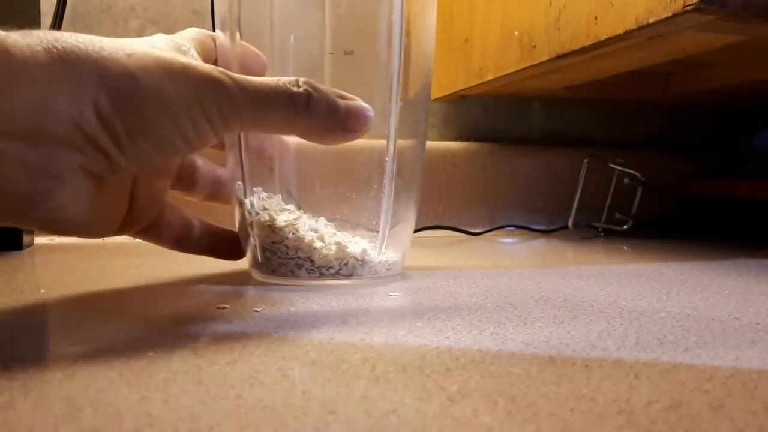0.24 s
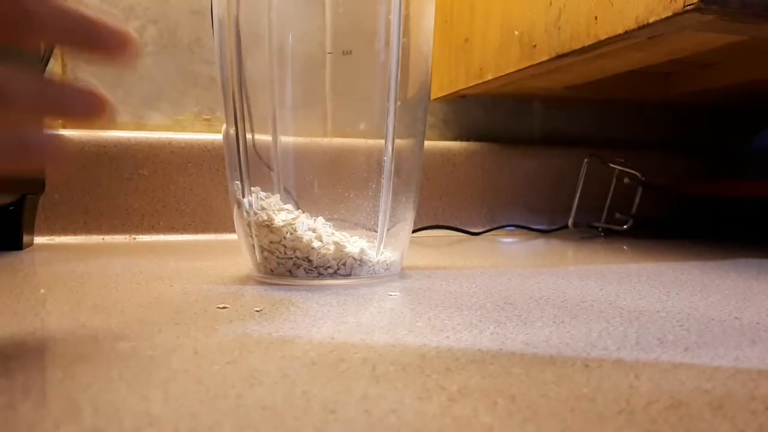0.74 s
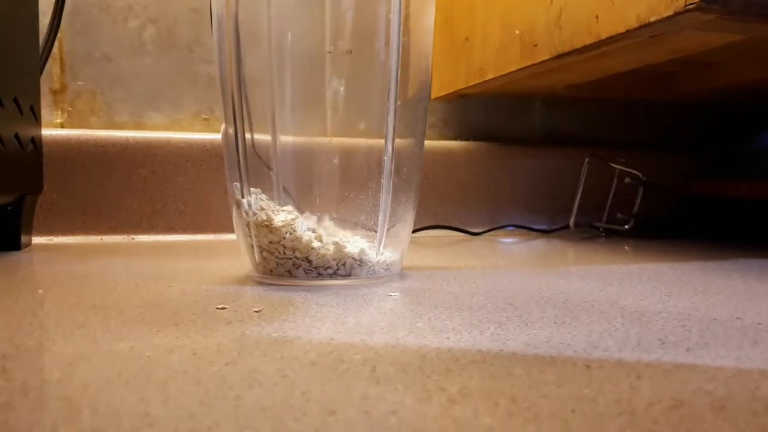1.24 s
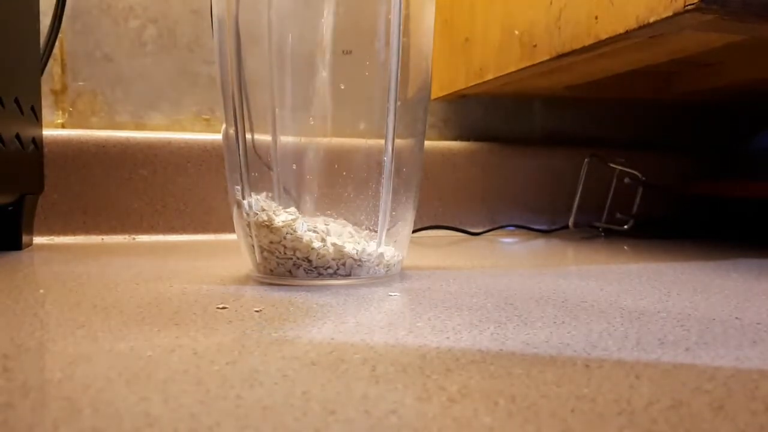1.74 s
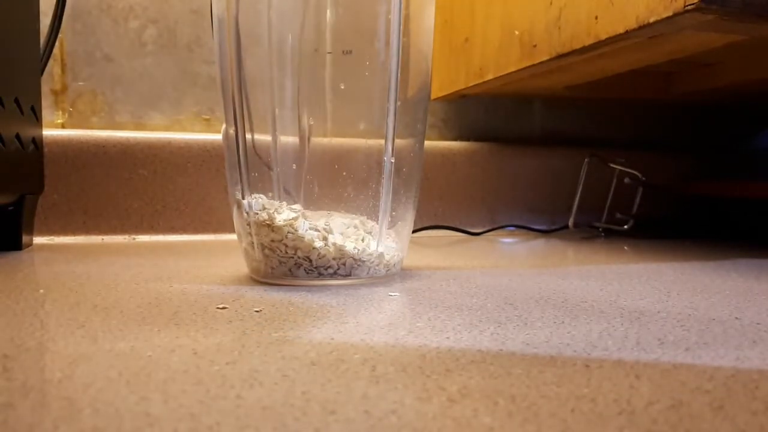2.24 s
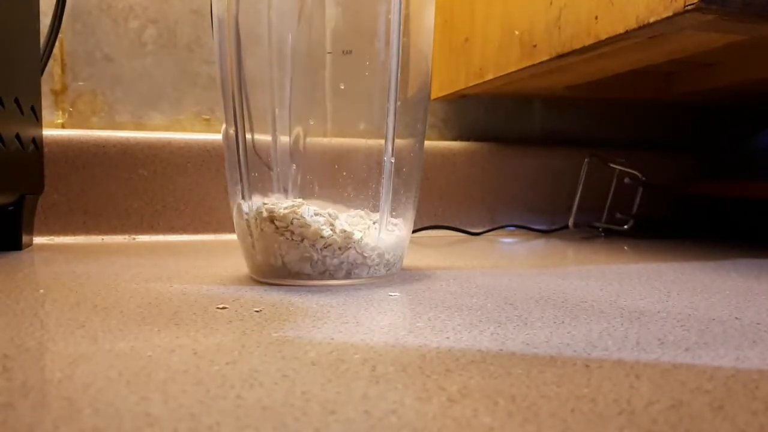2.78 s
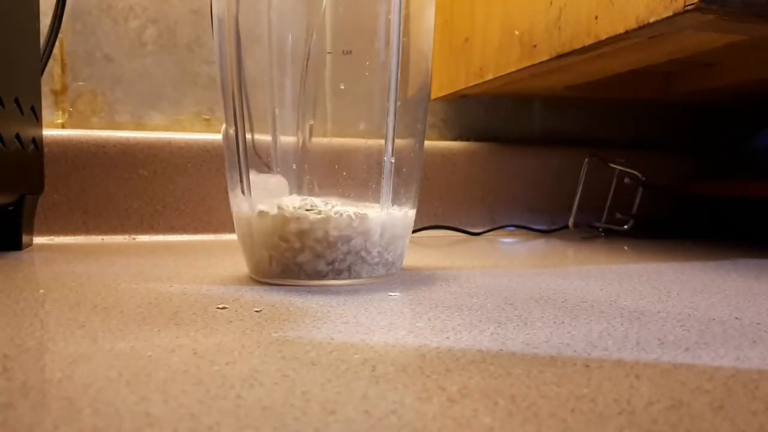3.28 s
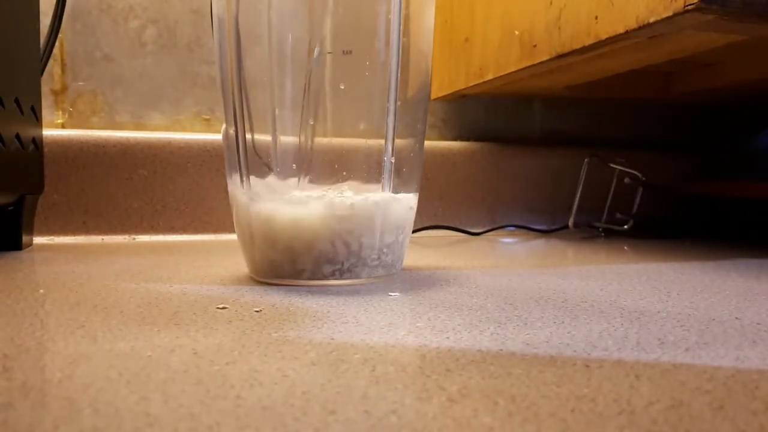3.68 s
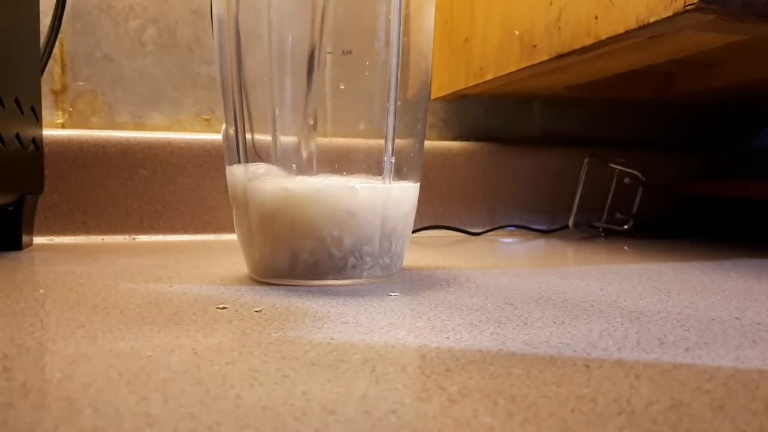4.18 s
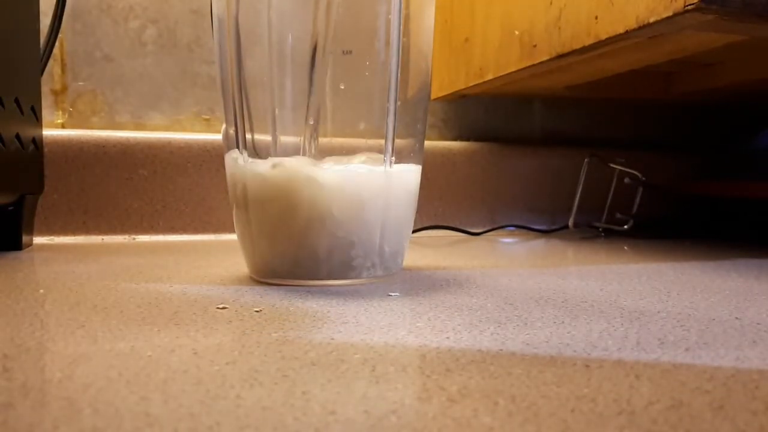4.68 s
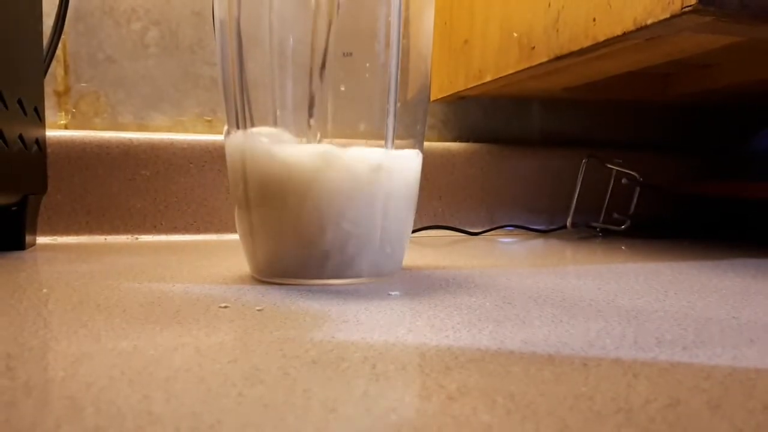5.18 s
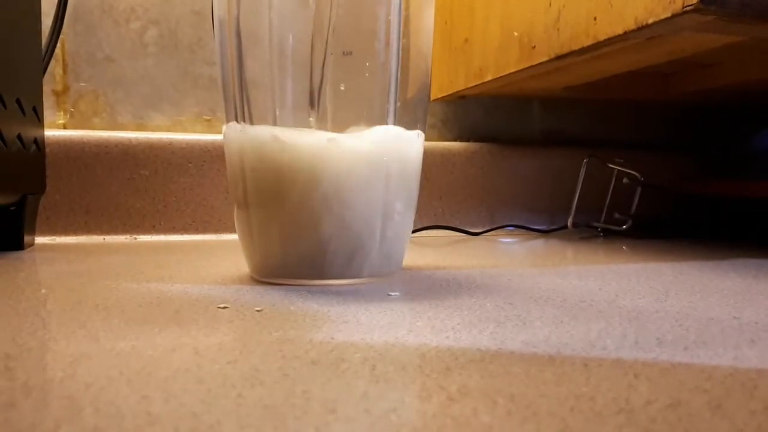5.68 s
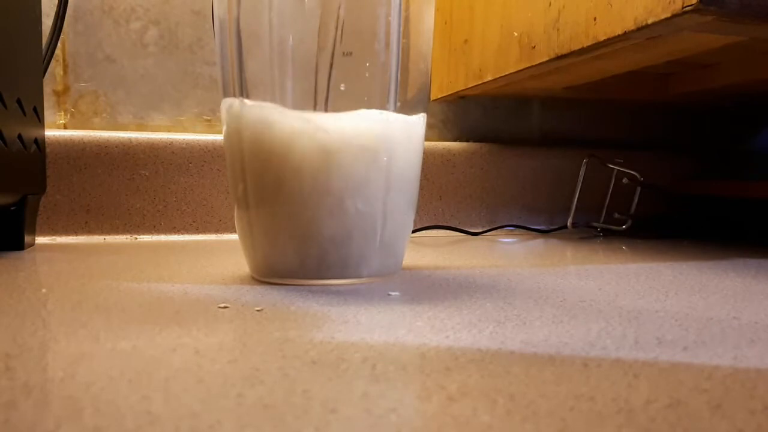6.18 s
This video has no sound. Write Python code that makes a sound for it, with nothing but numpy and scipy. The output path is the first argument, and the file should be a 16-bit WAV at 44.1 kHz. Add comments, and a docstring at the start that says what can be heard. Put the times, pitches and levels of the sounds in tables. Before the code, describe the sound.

A soft, brief rub of fingers leaving a plastic blender cup opens the sound, over a faint, steady kitchen appliance hum. At about 1.1 seconds water starts dribbling onto dry oats in the cup with a few hollow splats. From 1.6 seconds it gushes, pattering on the flakes and plastic walls, with bubbly plops and deep, hollow gulps that are loudest between 1.8 and 2.8 seconds. From 3 seconds the water pools and burbles, with small bright bubble pings and another gulp and blip near 3.6 seconds. After 4 seconds the stream runs ever more softly into the wet oats, the cup's hollow tone rising slightly as it fills. A thin ring and a light foamy fizz join around 4.6 seconds. The pour swells briefly near 5.8 seconds and dwindles to a faint trickle by about 6.4 seconds. Everything is close, with little room echo.

```python
"""Water poured onto dry oats in a tall plastic blender cup on a kitchen counter.
The stream patters on the flakes, gulps as it digs through them, then runs ever more softly into the slurry.
The air column above the water rings at a pitch that climbs as the cup fills.
Before the pour a hand lets go of the cup; the kitchen hums behind."""
import sys
import numpy as np
from scipy import signal
from scipy.fft import rfft, irfft, next_fast_len
from scipy.io import wavfile

SR = 44100
rng = np.random.default_rng(int(sys.argv[2]) if len(sys.argv) > 2 else 0)


def persist_wave(psi):
    """Save psi, clipped to +-1, as 16-bit WAV."""
    counts = np.round(np.clip(psi, -1, 1) * 32767).astype(np.int16)
    wavfile.write(sys.argv[1], SR, np.atleast_2d(counts).T)


N = 283563
TIME = np.arange(N) / SR

# Table levels are relative; each layer adds its own gain.
# stream strength in the first dribble, full pour and taper: time_s, level_db
FLOW_DRIBBLE = [(1.07, -70), (1.098, -56.5), (1.24, -52.5), (1.348, -65.5), (1.5, -69.5)]
FLOW_GUSH = [(1.52, -65), (1.665, -53), (1.69, -47), (1.92, -51.5), (1.94, -40.5), (2.05, -50.5),
             (2.57, -54), (2.62, -53.5), (3.71, -56), (3.75, -62.5)]
FLOW_TAPER = [(3.8, -59), (4.43, -57.5), (4.47, -51), (4.49, -61), (4.88, -60), (4.92, -64.5), (5.21, -63),
              (6.43, -74)]
# stream breaks into fresh oats and froths: start_s, length_s, boost_db
SURGES = [(1.223, 0.094, 8.5), (2.195, 0.1, 7), (2.576, 0.24, 8.5), (2.997, 0.08, 7), (3.188, 0.086, 6.5),
          (3.652, 0.21, 4), (4.385, 0.076, 2.5), (4.712, 0.18, 3), (5.08, .09, 2.5), (5.22, .34, 2),
          (5.826, 0.2, 8)]
# oats under water: time_s, share
SOAKED_SHARE = [(1.35, 0.1), (1.7, 0.67), (2.9, 0.72), (4.0, 0.99)]
# churning that stirs the air in the cup: time_s, level_db
CHURN_LEVEL = [(1.07, -88), (1.67, -52.5), (1.89, -48), (2.01, -42.5), (2.62, -43.5), (3.13, -48.5),
               (4.2, -55), (5.1, -64), (5.61, -58), (6.43, -61)]
# thin ring of the filling cup: time_s, level_db
THIN_RING_LEVEL = [(4.1, -82), (4.6, -67), (5.5, -70.5), (6.43, -79)]

# splashes on flakes and wall: start_s, splash_db, spray_db
SPLASHES = [(1.1, -48.5, -64), (1.1774, -43.5, -55), (1.2137, -38, -49.5), (1.2587, -40, -53),
            (1.535, -48.5, -66), (1.557, -58, -60), (1.593, -42.5, -50.5), (1.643, -52, -51.5),
            (1.657, -64, -54), (1.6772, -30.5, -57), (1.709, -31, -54), (1.721, -41, -50),
            (1.837, -34, -50.5), (1.939, -25.5, -51), (1.9935, -28, -60), (2.122, -36.5, -61),
            (2.244, -33.5, -50.5), (2.369, -37.5, -59), (2.485, -37.5, -68), (2.601, -34.5, -56),
            (2.626, -50, -54), (2.649, -33.5, -52.5), (2.68, -43, -61), (2.736, -39, -58),
            (2.7543, -38, -59), (2.764, -39, -58), (2.807, -49, -62), (2.8737, -36.5, -80),
            (2.93, -36, -70), (3.1875, -56, -59), (3.211, -42, -65), (3.4292, -49, -63),
            (3.533, -39.5, -63), (3.59, -43, -63), (3.69, -60, -61), (4.2924, -46, -66), (4.458, -48, -61)]
# fat blobs hitting the dry heap: start_s, level_db
BLOBS = [(1.2373, -33), (1.2585, -34), (1.276, -37), (1.298, -43), (1.644, -40), (1.688, -40), (1.769, -40),
         (1.859, -37)]
# air pockets driven under: start_s, throb_db, thump_db, pitch_hz
GULPS = [(1.747, -35, -47, 558), (1.77, -34.5, -50, 554), (1.795, -28, -38, 531), (1.821, -23.5, -37, 526),
         (1.86, -23.5, -33, 531), (1.88, -22.5, -41, 542), (1.908, -33, -36, 566), (1.918, -19.5, -35, 548),
         (1.948, -24, -38, 555), (1.972, -33, -41, 570), (2.006, -31.5, -45, 595), (2.041, -26.5, -42, 546),
         (2.103, -31.5, -60, 525), (2.123, -31, -43, 562), (2.136, -27.5, -44, 558),
         (2.184, -36.5, -61, 555), (2.222, -22, -34, 532), (2.238, -17, -42, 525),
         (2.264, -20.5, -28.5, 532), (2.294, -22.5, -47, 538), (2.329, -34, -53, 543),
         (2.347, -27, -35.5, 538), (2.368, -29, -38, 554), (2.415, -33.5, -40.5, 534),
         (2.446, -32.5, -48, 549), (2.473, -35, -54, 537), (2.536, -33, -48, 559), (2.594, -27, -37, 546),
         (2.606, -16, -27, 544), (2.619, -18, -25, 534), (2.638, -17, -43, 535), (2.658, -21.5, -28.5, 557),
         (2.675, -20, -20.5, 555), (2.695, -16.5, -42, 534), (2.723, -28, -25, 558),
         (2.74, -26.5, -24.5, 558), (2.755, -23.5, -48, 540), (2.771, -30.5, -31.5, 559),
         (2.806, -28.5, -31.5, 555), (2.873, -30, -42, 573), (2.932, -34.5, -46, 592),
         (2.988, -30.5, -46, 581), (3.046, -38, -57, 556), (3.087, -36, -56, 570), (3.208, -35.5, -62, 606),
         (3.232, -40, -44, 620), (3.354, -43.5, -39, 562), (3.4, -33, -52, 587), (3.527, -38.5, -39, 564),
         (3.612, -28.5, -27, 561), (3.686, -39, -37, 598), (3.713, -37.5, -37.5, 587),
         (3.933, -38.5, -50, 590), (3.948, -39, -40, 585), (4.049, -41, -40, 595), (4.353, -45.5, -58, 614),
         (4.381, -43.5, -55, 595), (4.468, -42, -36, 592)]
# large bubbles bursting at the surface: start_s, level_db
PLOPS = [(1.711, -36.5), (1.747, -34.5), (1.769, -34.5), (1.794, -34), (1.821, -37), (1.858, -31.5),
         (1.916, -31), (1.973, -36), (2.131, -41), (2.245, -35.5), (2.264, -40), (2.594, -36), (2.605, -30),
         (2.655, -49), (2.677, -50), (2.731, -37), (3.612, -37.5)]
# clear bubbles, each leading a cluster: start_s, level_db, pitch_hz
PINGS = [(2.986, -43, 2935), (3.0515, -47, 3500), (3.232, -46, 2725), (3.661, -50, 3500),
         (4.797, -56, 3000), (4.8544, -58, 2300), (5.0823, -57, 3530), (5.107, -58, 3090),
         (5.303, -59, 2280), (5.3494, -63, 2290), (5.544, -61, 3020), (5.9144, -63, 4200),
         (6.0145, -60, 3400), (6.178, -64, 3160)]
# one large bubble snapping shut: start_s, level_db, pitch_hz
BLIP = (3.6205, -38.5, 1244)
# skin slipping on plastic: start_s, level_db, fade_db_per_s
HAND_SLIPS = [(0, -49, 110), (0.168, -58.5, 41.3)]

# resonances: pitch_hz, width_hz, gain_db
CUP_MODES = [(159, 3.8, -3.5), (203.4, 7.5, -6), (261, 17.6, -1), (325.8, 22, 0.5), (359.6, 19, 2),
             (542, 38, -6.5)]  # cup standing on the counter
DRY_DRUM_MODES = [(155.5, 6.2, 6), (178.5, 12, 3.5), (239.7, 20, 5)]  # cup drummed through dry flakes
DRY_KNOCK_MODES = [(1480, 66, 3), (1905, 180, -5.5)]  # cup knocked through dry flakes
WET_KNOCK_MODES = [(1030, 520, -17.5), (1490, 120, -7.5)]  # knock dulled by water
WALL_MODES = [(5120, 76, 9), (5910, 90, -1), (6170, 79, 2), (6630, 120, 1), (7500, 180, -4.5)]  # thin wall under spray
UPPER_CUP_MODES = [(1818, 40, -6), (2590, 80, -1), (2980, 70, -2), (3170, 70, -4), (3520, 190, -5),
                   (4870, 30, -5)]  # cup above the water
HOLLOW_MODES = [(1490, 130, 0.5), (1950, 250, -4), (2500, 250, -15)]  # empty cup slapped by blobs
PLOP_MODES = [(690, 60, -2), (885, 70, 0.5), (1020, 190, 5), (1450, 88, 4.5)]  # surface closing over a pocket

# noise spectra: freq_hz, density_db
PATTER_SPECTRUM = [(1000, -12.5), (1700, -14.5), (2180, -8.5), (2680, -0.5), (3200, -6), (3560, -1),
                   (4540, -12), (5010, -9), (5430, -15), (6000, -15), (7800, -46), (13200, -120)]
SPRAY_SPECTRUM = [(3000, -27), (4500, -8), (5500, -9), (7000, -3.5), (8300, -5.5), (9400, -18.5),
                  (11000, -9.5), (16000, -16)]
SLAP_SPECTRUM = [(400, -44), (700, 1), (1100, 3), (1550, -16), (2400, -6), (3200, 3), (6000, -43)]  # splash on bare flakes
FINGER_SPECTRUM = [(200, -8), (700, -12.5), (1100, -12), (1900, -26.5), (2400, -19.5), (4000, -26.5),
                   (5200, -45), (16000, -47)]
REFLECTION_SPECTRUM = [(300, -17), (600, -13), (1400, 2.5), (4000, -3.5), (16000, -3.5)]
KITCHEN_SPECTRUM = [(15, -63), (25, -44), (49, -5.5), (157, -10), (217, -3), (293, -6.5), (354, 1),
                    (384, -12), (531, -9.5), (714, -16), (775, -19), (936, -25.5), (1130, -22.5),
                    (1890, -35.5), (16000, -47)]

# bubble and droplet strength: pitch_hz, weight_db
BURBLE_WEIGHTS = [(680, -16), (800, -8), (1050, 6), (1250, 1.5), (1480, 3.5), (1700, -5), (2100, -3),
                  (3000, -32)]  # trapped bubbles
PLINK_WEIGHTS = [(2000, -13), (2300, 3), (2800, 7), (3600, 8), (4200, 4.5), (4900, -10)]  # small bubbles
SPIT_WEIGHTS = [(4200, 1), (6500, -1), (8200, -5), (9500, -13), (11000, -9), (15000, -14)]  # tiniest droplets
FOAM_WEIGHTS = [(3500, 1), (4100, -5), (5000, -8.5), (6200, -16)]

# left-right likeness of diffuse sound: freq_hz, correlation
STEREO_CORRELATION = [(60, 0.94), (300, 0.64), (640, 0.03), (1400, 0.054), (3000, 0.06), (15000, 0.065)]

FIRST_DROP_DB = 16  # over the droplets that follow


def stream():
    """Gains over time: the flow drives five layers, the churning drives the air column."""
    flow_db = curve(np.vstack([FLOW_DRIBBLE, FLOW_GUSH, FLOW_TAPER]))
    surge_db = surge_boost_db()
    pouring = np.clip((TIME - FLOW_DRIBBLE[0][0]) / 0.1, 0, 1)
    patter = flow_gain(flow_db, base_db=-56, slope=1) * from_db(0.34 * surge_db) * wobble()
    flake_spray = flow_gain(flow_db, base_db=-56.5, slope=0.57) * bare_share(TIME)
    pool_spray = flow_gain(flow_db, base_db=-70, slope=0.41)
    spray = np.hypot(flake_spray, pool_spray) * from_db(0.23 * surge_db)
    thickening_db = 3.5 * np.maximum(TIME - 4.46, 0)  # thick slurry traps fewer bubbles
    froth = flow_gain(flow_db, base_db=-58, slope=1.14) * from_db(surge_db - thickening_db)
    drum = flow_gain(flow_db, base_db=-51.5, slope=0.88) * from_db(0.98 * surge_db)
    rings = flow_gain(flow_db, base_db=-63.5, slope=0.85)
    column = from_db(curve(CHURN_LEVEL) + 0.21 * surge_db)
    return pouring * np.array([patter, spray, froth, drum, rings, column])


def flow_gain(flow_db, base_db, slope, usual_flow_db=-56):
    """Layer gain: base_db at the usual flow, plus slope dB per dB of flow."""
    return from_db(base_db + slope * (flow_db - usual_flow_db))


def surge_boost_db(edge_s=0.0078):
    """Each surge swells, holds and falls back."""
    return sum(db * np.clip(np.minimum(TIME - start_s, start_s + length_s + edge_s - TIME) / edge_s, 0, 1)
               for start_s, length_s, db in SURGES)


def wobble(rate_hz=30, depth_db=1.8):
    """The stream wobbles at random, so drops and bubbles come in clumps."""
    steps = rng.standard_normal(int(TIME[-1] * rate_hz) + 2)
    return from_db(depth_db * np.interp(TIME * rate_hz, np.arange(len(steps)), steps))


def bare_share(time_s, cover_start_s=1.53, cover_tau_s=0.74):
    """Share of flakes the pour has not yet covered."""
    return np.exp(-np.maximum(time_s - cover_start_s, 0) / cover_tau_s)


def soak():
    """Dry and flooded gains; powers sum to 1."""
    share = np.clip(curve(SOAKED_SHARE), 0, 1)
    return np.sqrt(1 - share), np.sqrt(share)


def splashing(patter_gain, spray_gain, bubble_gain, dry, wet):
    """Drops and spray bounce between the plastic walls, ring them and knock the cup."""
    drops = impacts(per_s=700, spread_db=4)
    patter = patter_gain * (from_db(-4.5) * drops + from_db(-7) * impacts(per_s=5000, spread_db=-4))
    spray = spray_gain * (from_db(-4) * drops + from_db(-2) * impacts(per_s=510, spread_db=4.5))
    splats = np.zeros(N)
    for start_s, splash_db, spray_db in SPLASHES:
        clump = burst(rise_s=0.0004, t60_s=0.045)
        clump[0] += from_db(FIRST_DROP_DB)
        add(splats, start_s, from_db(splash_db - 7) * clump)
        add(spray, start_s, from_db(spray_db + 5.5) * clump)
    blows = from_db(12) * splats + from_db(1) * patter + from_db(14.5) * bubble_gain * drops
    knock = dry ** 4 * body(blows, DRY_KNOCK_MODES) + wet * body(blows, WET_KNOCK_MODES)
    stirred_air = from_db(23) * dry ** 2 * ring(ring(splats, 556, 114), 580, 460)
    flake_hits = wet * bare_share(TIME) * (splats + from_db(-10) * patter)
    slap = from_db(-5) * scatter(flake_hits, SLAP_SPECTRUM, t60_s=0.025, spots=2)
    wall = from_db(8) * scatter(body(spray, WALL_MODES), REFLECTION_SPECTRUM, t60_s=0.012, spots=2)
    spit = bubbles(SPIT_WEIGHTS, per_s=490, spread_db=3, cycles=200, left_db=3.5)
    pattering = scatter(patter + splats, PATTER_SPECTRUM, t60_s=0.036, spots=5)
    spraying = scatter(spray, SPRAY_SPECTRUM, t60_s=0.042, spots=4)
    return (pan(pattering, left_db=2) + pan(spraying + wall, left_db=2.5)
            + pan(knock + stirred_air + slap, left_db=0.5) + from_db(-6) * spray_gain * spit)


def gulping(column_gain, wet, throb_t60_s=0.07, bare_damping=0.8, upper_ratio=1.2):
    """Air pockets throb, water gurgles round them, churning keeps the air column ringing."""
    pockets, gurgles = np.zeros((2, N))
    upper_detunes = 1 + 0.039 * rng.standard_normal(len(GULPS))
    for (start_s, throb_db, _, pitch_hz), detune in zip(GULPS, upper_detunes):
        bare = bare_share(start_s)
        # bare flakes cut the throb short; among them a smaller pocket rings above it
        throb = chirp(pitch_hz, rise_s=0.0065, t60_s=throb_t60_s / (1 + bare_damping * bare),
                      climb_per_s=0.18)
        upper = chirp(upper_ratio * pitch_hz * detune, rise_s=0.012, t60_s=0.077, climb_per_s=0.33)
        add(pockets, start_s, from_db(throb_db) * (throb + from_db(-6) * bare * upper))
        add(gurgles, start_s, from_db(throb_db - 2) * burst(rise_s=0.0028, t60_s=0.075))
    stirring = impacts(per_s=1300, spread_db=2)
    churn = unit_rms(air_column(stirring, width_hz=36))
    churn += from_db(-17) * unit_rms(ring(ring(stirring, 660, 160), 850, 320))
    throbs = from_db(-3) * pockets + from_db(-20) * air_column(pockets, width_hz=11)
    gurgle = ring(ring(gurgles, 530, 180), 510, 670)
    return pan(throbs + column_gain * wet * churn + gurgle, left_db=2.4)


def air_column(x, width_hz, air_length_m=0.1591, fill_start_s=1.93, fill_m_per_s=0.009):
    """Air above the water: a quarter-wave pipe that shortens as the cup fills."""
    sound_m_per_s = 343
    length_m = air_length_m - fill_m_per_s * np.maximum(TIME - fill_start_s, 0)
    pitch_hz = sound_m_per_s / 4 / length_m
    phasor = np.exp(2j * np.pi * np.cumsum(pitch_hz) / SR)
    pole = np.exp(-np.pi * width_hz / SR)
    rung = 2 * (phasor * signal.lfilter([1 - pole], [1, -pole], x / phasor)).real
    return ring(rung, pitch_hz=573, width_hz=131)  # the mouth radiates a limited band


def drumming(drum_gain, wet):
    """Air pockets thump the cup and drops drum its low modes."""
    thumps = np.zeros(N)
    for start_s, _, thump_db, _ in GULPS:
        add(thumps, start_s, from_db([thump_db]))
    drops = impacts(per_s=1000, spread_db=2)
    wet_drum = from_db(-3) * drum_gain * wet * unit_rms(cup(drops, CUP_MODES))
    dry_gain = from_db(-51.5) * (drum_gain > 0) * np.sqrt(bare_share(TIME))
    dry_drum = dry_gain * unit_rms(cup(drops, DRY_DRUM_MODES))
    return pan(from_db(44) * cup(thumps, CUP_MODES) + wet_drum + dry_drum, left_db=2.4)


def cup(x, modes):
    """Low modes of the cup on the counter."""
    return bandpass(body(x, modes), band_hz=[110, 560])


def plopping():
    """Large bubbles burst; the surface closes over them."""
    pops = np.zeros(N)
    for start_s, level_db in PLOPS:
        add(pops, start_s, from_db(level_db + 5.5) * burst(rise_s=0.00021, t60_s=0.058))
    return pan(bandpass(body(pops, PLOP_MODES), band_hz=[550, 1800]), left_db=0.5)


def pinging(cluster_s=0.018, stray_octaves=0.23, follower_db=-5.5):
    """Single bubbles ring, each trailed by four weaker ones; one large bubble snaps shut."""
    pings = np.zeros(N)
    for start_s, level_db, pitch_hz in PINGS:
        leader = chirp(pitch_hz, rise_s=0.00063, t60_s=0.061, climb_per_s=0.55)
        add(pings, start_s, from_db(level_db + 3) * leader)
        for delay, stray in rng.random(size=(4, 2)):
            follower_hz = pitch_hz * 2 ** (stray_octaves * (2 * stray - 1))
            follower = chirp(follower_hz, rise_s=0.0004, t60_s=0.052, climb_per_s=1.2)
            add(pings, start_s + cluster_s * delay, from_db(level_db + follower_db) * follower)
    blip_s, blip_db, blip_hz = BLIP
    add(pings, blip_s, from_db(blip_db) * chirp(blip_hz, rise_s=0.001, t60_s=0.022, climb_per_s=2))
    return pan(pings, left_db=8)


def bubbling(patter_gain, bubble_gain, wet):
    """Once water pools, trapped bubbles burble and small ones plink."""
    burble = bubbles(BURBLE_WEIGHTS, per_s=900, spread_db=1.5, cycles=33, left_db=-2.5)
    plinks = bubbles(PLINK_WEIGHTS, per_s=520, spread_db=0, cycles=200, left_db=5)
    return wet * (from_db(-1.5) * bubble_gain * burble + from_db(-6.5) * patter_gain * plinks)


def cup_ringing(ring_gain, wet):
    """Drops on the pool ring the upper cup; one thin ring stands out as it fills."""
    upper = np.array([unit_rms(body(impacts(per_s=270, spread_db=5), UPPER_CUP_MODES)) for _ in range(2)])
    thin = unit_rms(ring(impacts(per_s=150, spread_db=2), pitch_hz=2300, width_hz=22))
    return pan(wet * (ring_gain * upper + from_db(curve(THIN_RING_LEVEL)) * thin), left_db=-3.5)


def blob_slaps():
    """Fat blobs hit the dry heap with a hollow splat: one firm blow, then scattered drops."""
    blows = np.zeros(N)
    for start_s, level_db in BLOBS:
        clump = burst(rise_s=0.0005, t60_s=0.025)
        clump[0] += from_db(FIRST_DROP_DB + 3)
        add(blows, start_s, from_db(level_db + 11) * clump)
    return pan(bandpass(body(blows, HOLLOW_MODES), band_hz=[500, 3000]), left_db=0)


def foam(start_s=4.6, gather_s=0.5):
    """Foam gathers on the slurry and fizzes, swelling with surges and fading with the stream."""
    gathered = np.clip((TIME - start_s) / gather_s, 0, 1)
    gain = gathered * flow_gain(curve(FLOW_TAPER) + surge_boost_db(), base_db=-67.5, slope=0.48)
    return gain * bubbles(FOAM_WEIGHTS, per_s=300, spread_db=3, cycles=90, left_db=0)


def hand(rise_s=0.0021):
    """Skin slips on the plastic and stirs the air in the cup."""
    rub = np.zeros(N)
    for start_s, level_db, fade_db_per_s in HAND_SLIPS:
        age_s = np.maximum(TIME - start_s, 0)
        rub += np.minimum(age_s / rise_s, 1) * from_db(level_db - fade_db_per_s * age_s)
    hollow = pan(unit_rms(air_column(impacts(per_s=770, spread_db=5.5), width_hz=39)), left_db=4)
    return rub * (from_db(1.5) * hollow + from_db(-4) * noise(FINGER_SPECTRUM, N))


def kitchen(mains_hz=60):
    """A running appliance: mains hum, air noise and a low drone."""
    hum = from_db(-62.5) * np.sin(2 * np.pi * mains_hz * TIME)
    drone = from_db(-66) * unit_rms(ring(ring(rng.standard_normal(N), 369, 31), 360, 150))
    return from_db(-55) * noise(KITCHEN_SPECTRUM, N) + hum + drone


def bubbles(weights, per_s, spread_db, cycles, left_db, climb=0.04):
    """Random small bubbles; each rises slightly in pitch and decays 60 dB over `cycles`."""
    low_hz, high_hz = weights[0][0], weights[-1][0]
    when, bore, force, spot, sign = rng.random(size=(int(per_s * TIME[-1]), 5)).T
    starts_s = when * (TIME[-1] - 0.001)
    lags_s = 0.0006 * (spot - 0.5)
    pitches_hz = low_hz * (high_hz / low_hz) ** bore
    levels_db = at_hz(weights, pitches_hz) + spread_db * np.minimum(-np.log(1 - force), 4)
    sizes = np.sign(sign - 0.5) * pitches_hz * from_db(levels_db)
    left, right = np.zeros((2, N))
    for start_s, pitch_hz, size, lag_s in zip(starts_s, pitches_hz, sizes, lags_s):
        life = TIME[:int(SR * cycles / pitch_hz)] * pitch_hz / cycles  # 0 to 1
        rung = size * from_db(-60 * life) * np.sin(2 * np.pi * cycles * life * (1 + climb * life / 2))
        add(left, start_s, rung)
        add(right, abs(start_s + lag_s), rung)
    return pan(unit_rms(np.array([left, right])), left_db)


def chirp(pitch_hz, rise_s, t60_s, climb_per_s):
    """One bubble: swells, dies and rises in pitch as it surfaces."""
    shape = swell(rise_s, t60_s)
    return shape * np.sin(2 * np.pi * pitch_hz * np.cumsum(1 + climb_per_s * TIME[:len(shape)]) / SR)


def impacts(per_s, spread_db):
    """Impulses of random time, size and sign; rms 1."""
    sizes = from_db(spread_db * np.minimum(rng.exponential(1, N), 4))
    return unit_rms(sizes * rng.choice([-1, 1], N) * (rng.random(N) < per_s / SR))


def burst(rise_s, t60_s):
    """A clump of droplets as a noise burst."""
    shape = swell(rise_s, t60_s)
    return shape * rng.standard_normal(len(shape))


def swell(rise_s, t60_s):
    """Rise-and-decay envelope; peak 1."""
    age_s = TIME[:SR // 6]
    shape = (1 - np.exp(-age_s / rise_s)) * from_db(-60 * age_s / t60_s)
    return shape / shape.max()


def body(x, modes):
    """Parallel resonances."""
    return sum(from_db(gain_db) * ring(x, pitch_hz, width_hz) for pitch_hz, width_hz, gain_db in modes)


def ring(x, pitch_hz, width_hz):
    """One resonance; peak gain 1."""
    radius = np.exp(-np.pi * width_hz / SR)
    feedback = [1, -2 * radius * np.cos(2 * np.pi * pitch_hz / SR), radius ** 2]
    return signal.lfilter(np.array([1, 0, -1]) * (1 - radius ** 2) / 2, feedback, x + 1e-18)


def scatter(x, spectrum, t60_s, spots):
    """Drops land on different spots, each with its own echoes in the cup."""
    spot = rng.integers(0, spots, N)
    return sum(echoes(x * (spot == k), spectrum, t60_s) for k in range(spots))


def echoes(x, spectrum, t60_s):
    """Dense decaying reflections; unit-energy tail."""
    tail = noise(spectrum, next_fast_len(int(t60_s * SR), True))
    tail *= from_db(-60 * TIME[:tail.shape[1]] / t60_s)
    tail /= np.sqrt(np.sum(tail ** 2, axis=1, keepdims=True))
    return signal.oaconvolve(np.atleast_2d(x), tail, axes=1)[:, :N]


def noise(spectrum, samples):
    """Coloured stereo noise, correlated in the bass; rms 1."""
    freq_hz = np.fft.rfftfreq(samples, 1 / SR)
    correlation = np.clip(at_hz(STEREO_CORRELATION, freq_hz), -1, 1)
    mid, side = rfft(rng.standard_normal((2, samples)))
    pair = np.sqrt(1 + correlation) * mid + np.sqrt(1 - correlation) * side * [[1], [-1]]
    return unit_rms(irfft(pair * from_db(at_hz(spectrum, freq_hz)), samples))


def pan(x, left_db, left_lead_s=0.000136):
    """Pan by level; the left channel leads."""
    left, right = np.broadcast_to(x, (2, N))
    right = np.roll(right, round(left_lead_s * SR))
    return np.array([left * from_db(left_db / 2), right * from_db(-left_db / 2)])


def bandpass(x, band_hz):
    return signal.sosfilt(signal.butter(2, band_hz, "band", fs=SR, output="sos"), x)


def curve(points):
    return np.interp(TIME, *np.transpose(points))


def at_hz(points, freq_hz):
    """Interpolate on a log-frequency axis."""
    known_hz, values = np.transpose(points)
    return np.interp(np.log(freq_hz + 1), np.log(known_hz), values)


def add(track, start_s, sound):
    start = int(start_s * SR)
    track[start:start + len(sound)] += sound[:N - start]


def from_db(db):
    return 10 ** (np.asarray(db) / 20)


def unit_rms(x):
    return x / np.sqrt(np.mean(x ** 2) + 1e-20)


def scene():
    """The cup close by, early reflections from counter and cabinets, the kitchen behind."""
    patter_gain, spray_gain, bubble_gain, drum_gain, ring_gain, column_gain = stream()
    dry, wet = soak()
    near = (splashing(patter_gain, spray_gain, bubble_gain, dry, wet)
            + plopping() + pinging() + bubbling(patter_gain, bubble_gain, wet)
            + gulping(column_gain, wet) + drumming(drum_gain, wet) + cup_ringing(ring_gain, wet)
            + blob_slaps() + foam() + hand())
    return near + from_db(-7.5) * echoes(near, REFLECTION_SPECTRUM, t60_s=0.13) + kitchen()


def record(dry):
    """Steep low-pass."""
    cutoff_hz = 15900
    return signal.sosfilt(signal.ellip(12, 0.1, 80, cutoff_hz, fs=SR, output="sos"), dry)


dry = scene()
out = record(dry)
persist_wave(out)
```